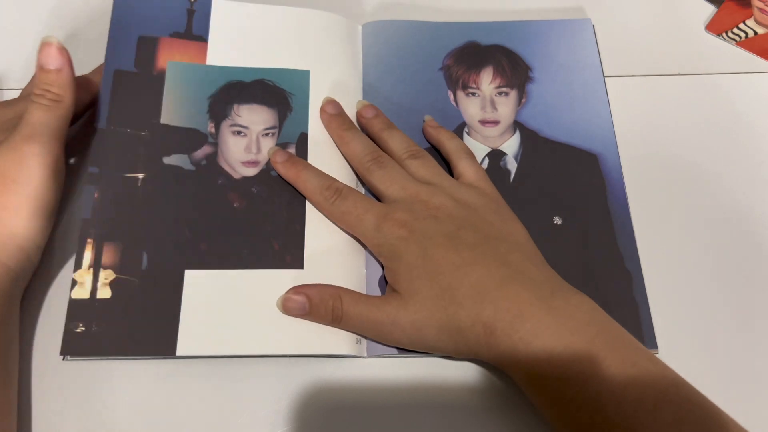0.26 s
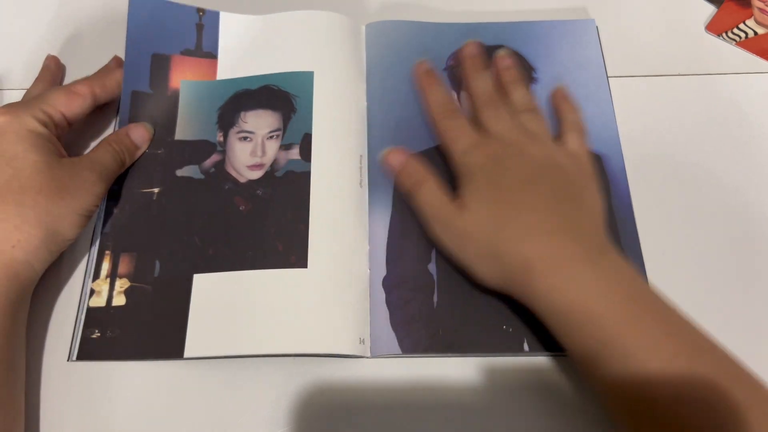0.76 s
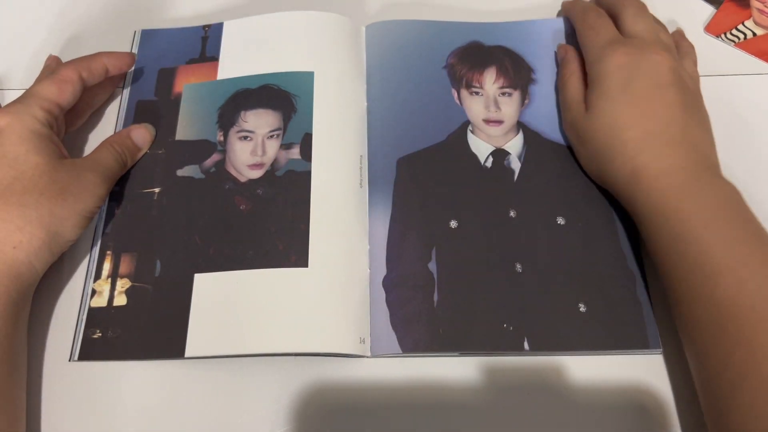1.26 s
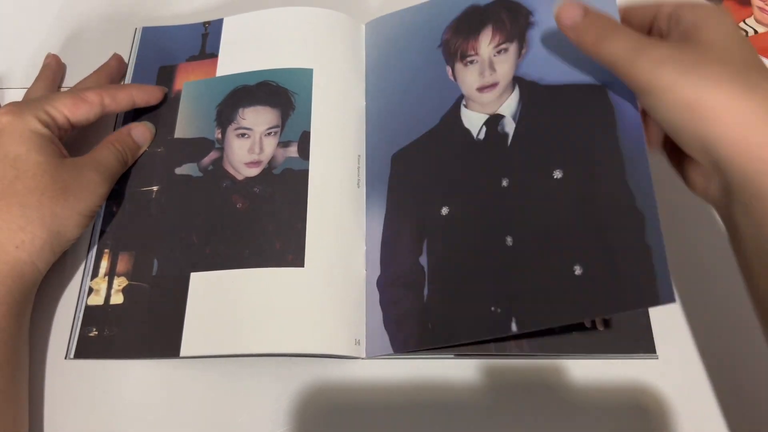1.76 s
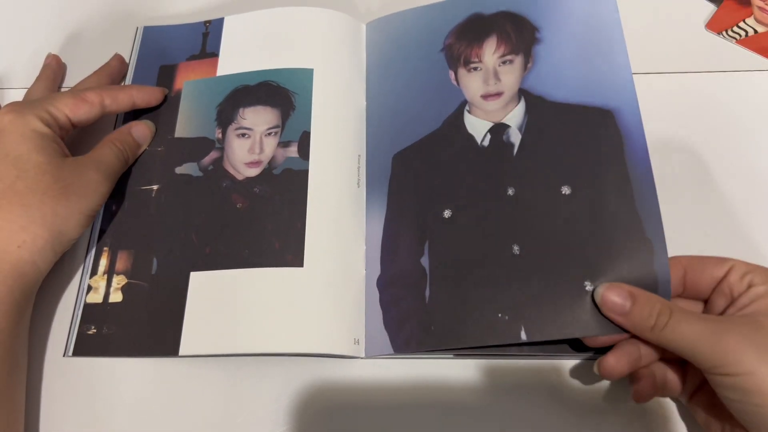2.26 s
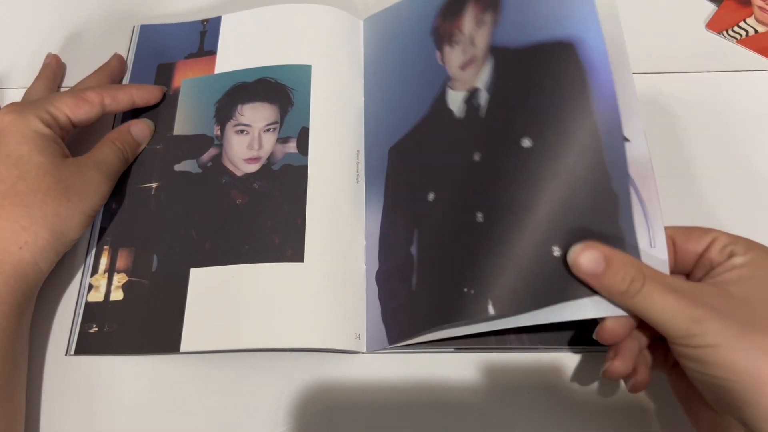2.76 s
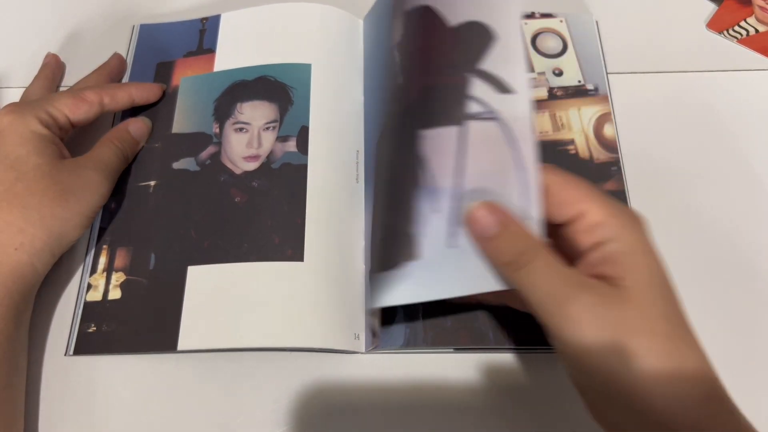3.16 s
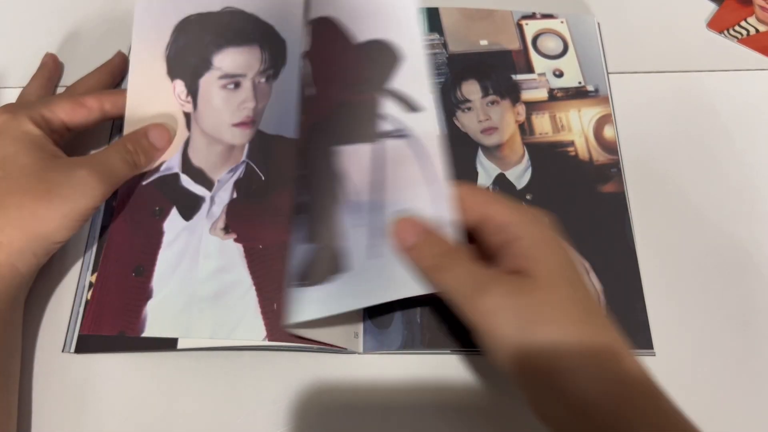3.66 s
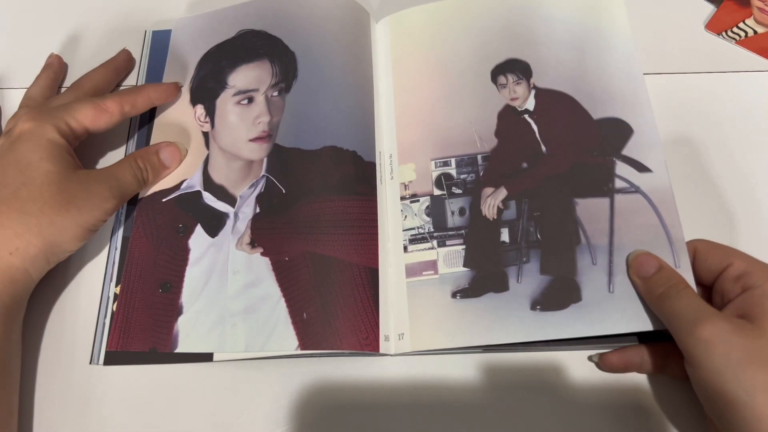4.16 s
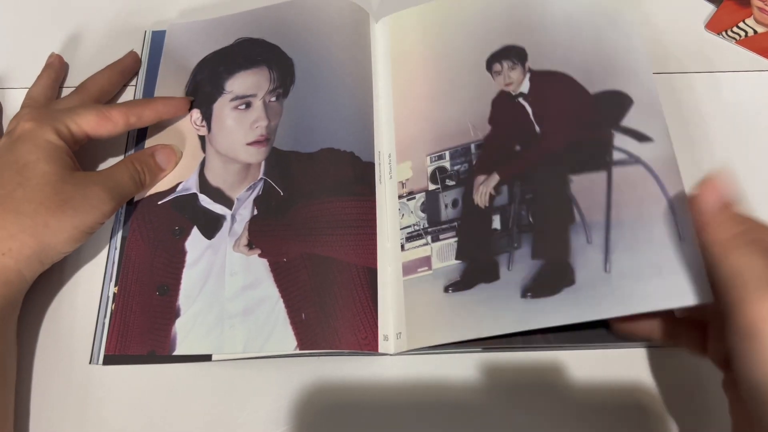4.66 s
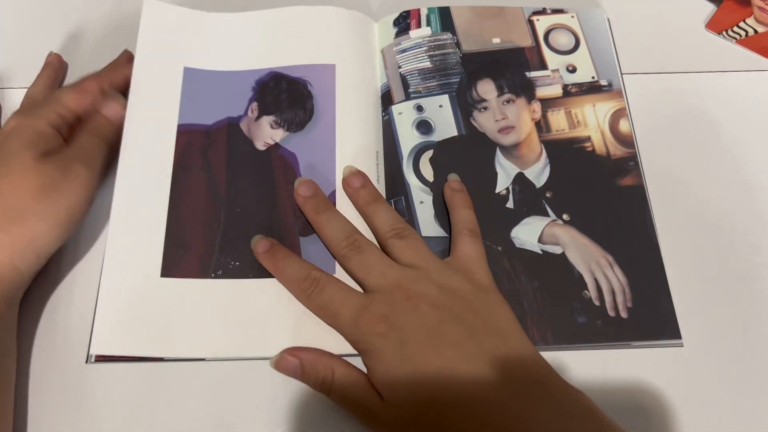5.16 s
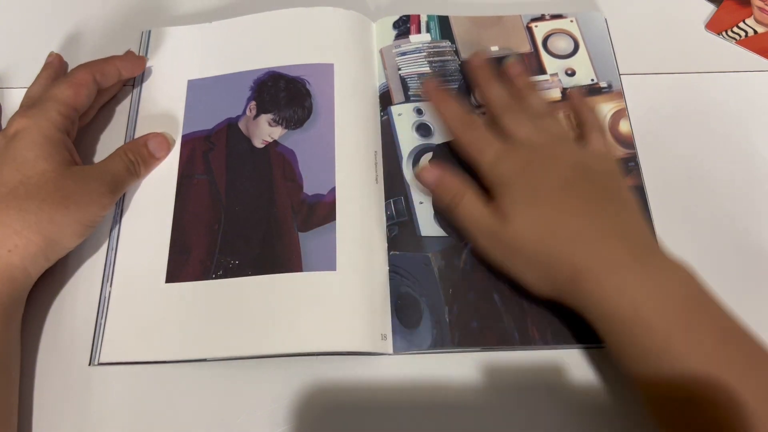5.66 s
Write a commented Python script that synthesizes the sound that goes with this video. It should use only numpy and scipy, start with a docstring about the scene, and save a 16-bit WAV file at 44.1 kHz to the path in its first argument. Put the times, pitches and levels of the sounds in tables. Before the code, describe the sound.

Close indoor sound of a glossy photo book handled on a table. A hand slides softly over a page, then fumbles at its edge with small creaks and taps. A singing scrape leads to bright snaps as pages turn, with more crackles and thuds. After a quieter hold, another page is flipped and smoothed with a fading hiss. Phone stereo pickup, faint room hiss.

```python
"""First a short rustle of paper that dies away into a faint narrow hiss and a low rumble: a quiet room.
Then hands smooth and turn the glossy pages of a book on a table, under a phone's two microphone ports.
Skin and sheets slide in dense random slips; bent sheets creak and snap through resonances of the paper;
a drag along a sheet edge sings with a sinking pitch. Fingers and pages thud on the table top, nails or
sheet corners tick, and the walls echo these short hits. The two ports hear it all with unlike phase."""
import sys
import numpy as np
from scipy import signal
from scipy.fft import rfft, irfft
from scipy.io import wavfile
from scipy.ndimage import uniform_filter1d

SR = 44100
rng = np.random.default_rng(int(sys.argv[2]) if len(sys.argv) > 2 else 0)


def unload_wav(signal):
    """Save mono or channel-first audio to the path in sys.argv[1] as 16-bit WAV at rate SR, clipped to [-1, 1]."""
    wavfile.write(
        sys.argv[1],
        SR,
        np.round(np.clip(np.atleast_2d(signal).T, -1, 1) * 32767).astype(np.int16),
    )


N = 261513
HZ = np.maximum(np.fft.rfftfreq(N, 1 / SR), 1)
T = np.arange(N) / SR


def undb(db):
    """Decibels to gain."""
    return 10 ** (np.asarray(db) / 20)


def unit(x):
    """Scale to rms 1."""
    return x / np.sqrt(np.mean(x ** 2))


def over_hz(table, column=1):
    """Read a table column along a log-frequency axis."""
    rows = np.array(table, float)
    return np.interp(np.log(HZ), np.log(rows[:, 0]), rows[:, column])


def colour(x, gain):
    """Filter by a gain per frequency."""
    return irfft(rfft(x) * gain, N)


def steep(x, hz, kind):
    """Steep high- or low-pass."""
    return signal.sosfilt(signal.butter(4, hz, kind, fs=SR, output="sos"), x)


def ring(x, hz, width_hz):
    """One resonance, gain 1 at the centre."""
    return signal.lfilter(*signal.iirpeak(hz, hz / width_hz, fs=SR), x)


def modes(x, table):
    """Resonances of a body, each a narrow ring followed by one three times as wide, summed."""
    return sum(undb(db) * ring(ring(x, hz, width), hz, 3 * width) for hz, width, db in table)


def fade(t, t60):
    """Exponential decay by 60 dB in t60 seconds, at least 10 ms."""
    return np.exp(-np.log(1000) * t / max(t60, .01))


def walk(rate):
    """Slow random wander of rms 1: levels held 1 / rate seconds, smoothed twice."""
    hold = int(SR / rate)
    steps = np.repeat(rng.standard_normal(N // hold + 1), hold)
    return unit(uniform_filter1d(uniform_filter1d(steps, hold), hold)[:N])


def slips(rate, spread_db, size=N):
    """Tiny slips of either sign at random moments, rate per second, a few much stronger than the rest."""
    happens, sign, strength = rng.random((size, 3)).T
    return (happens < rate / SR) * np.sign(sign - .5) * undb(-spread_db * np.log(1 - strength))


def add(out, s, x):
    """Mix x into out from time s."""
    i = int(s * SR)
    out[i:i + len(x)] += x[:N - i]


def together(a_db, b_db):
    """Two levels added as powers."""
    return 10 * np.log10(undb(a_db) ** 2 + undb(b_db) ** 2)


RAMP_DB = 20  # climbed in the attack, lost in the release; the same slopes run on outside


def gestures(table, column):
    """Level in dB of overlapping gestures, each an attack, a hold and a release; their powers add."""
    power = 1e-12
    for row in table:
        s, attack, hold, release = row[:4]
        rising = (s + attack - T) / attack
        falling = (T - s - attack - hold) / release
        slope = np.maximum(np.maximum(rising, falling), 0)
        power = power + undb(row[column] - RAMP_DB * slope) ** 2
    return 10 * np.log10(power)


ROOM_DB = -63.5  # rms level about which the room wanders
# Spectrum of the still room: (frequency [Hz], relative level [dB])
ROOM_SPECTRUM = [(18, -31), (35, 12), (70, -7), (130, -20), (300, -42), (450, -28), (620, -57),
                 (800, -25.5), (1000, -17.5), (1350, -22.5), (1560, -10), (1680, -7), (1830, -6),
                 (1980, -16), (2300, -18), (3000, -29), (3700, -26.5), (5000, -37), (9500, -41),
                 (16000, -26)]


def room():
    """A steady narrow hiss over low rumble: noise shaped by the spectrum of the room."""
    noise = unit(colour(rng.standard_normal(N), undb(over_hz(ROOM_SPECTRUM))))
    return noise * undb(ROOM_DB + 0.13 * walk(18))


ECHO_DB, ECHO_T60_S, ECHO_GAP_S = -11.5, 0.15, 0.004


def reflect(x, t60, after):
    """Dense random reflections that start after a gap and decay; the tail has unit energy."""
    t = np.arange(SR // 3) / SR
    tail = rng.standard_normal(len(t)) * fade(t, t60) * (t >= after)
    return signal.fftconvolve(x, tail / np.sqrt(np.sum(tail ** 2)))[:N]


# Resonances of the table top: (frequency [Hz], width of the narrow ring [Hz], level [dB])
TABLE_MODES = [(64.5, 16.8, 5.5), (95.2, 9.3, -0.5), (142, 27.6, -6.5), (186, 62, -16.5)]
# Resonances of loose pages: (frequency [Hz], width of the narrow ring [Hz], level [dB])
PAGE_MODES = [(197.7, 87, 9.5), (282, 174, -6), (470, 420, -3.5)]
FLAP_TOP_HZ = 544  # low-pass of the flapping pages


def hum(flap_db, press_db):
    """Loose pages flap dully; the table top hums under shifting pressure: slips ring the modes of each."""
    flap = unit(steep(modes(slips(600, 1.2), PAGE_MODES), FLAP_TOP_HZ, "low"))
    top = unit(modes(slips(900, 1.2), TABLE_MODES))
    return flap * undb(flap_db + 2.04 * walk(24.8)) + top * undb(press_db + 2.5 * walk(18))


THUD_T60_S, THUD_CYCLES = 0.13, 12.4  # ring time: a base [s] plus some cycles of the pitch
# Soft blows on the table: (time [s], peak level of the blow [dB], ring frequency [Hz],
# peak level of the loose pages relative to the blow [dB])
THUDS = [(0.222, -59.5, 310, 1), (0.238, -58, 233, -3), (0.369, -58, 167, -9), (0.385, -48.5, 107, -7.5),
         (0.526, -44.5, 196, -28), (0.538, -46, 95, -30), (0.691, -53, 71.6, -30), (0.846, -50.5, 235, -6),
         (0.861, -38, 123, -21), (0.878, -42, 94, -7), (1.5, -58, 99, 5.5), (1.768, -62, 188, 12),
         (1.831, -51, 190, -6), (1.854, -57.5, 91, -1), (1.901, -52, 189, -13), (1.922, -49, 179, -26),
         (2.133, -53.5, 69.4, 4.5), (2.263, -42.5, 75.4, -7), (2.368, -39.5, 86, -4.5),
         (2.408, -40, 68, -3), (2.463, -38, 78, -26), (2.698, -38, 93, -5.5), (2.891, -48, 140, 11.5),
         (2.924, -38.5, 170, 4), (3.072, -47, 208, 5), (3.192, -48, 168, -14), (3.292, -45.5, 95, -14),
         (3.482, -51, 104, 4), (3.622, -43.5, 230, 0), (3.739, -48, 183, 9), (3.845, -31, 72, -5),
         (3.911, -35.5, 172, -1.5), (4.206, -47, 100, 0.5), (4.253, -47, 76, -26), (4.335, -47, 213, -5),
         (4.351, -45.5, 82, -1.5), (4.578, -54.5, 252, -3), (4.669, -46.5, 110, 2), (4.813, -51, 262, -5),
         (4.823, -39.5, 208, -15), (4.837, -43, 202, -17), (5.068, -50.5, 194, 0), (5.089, -41, 116, -11),
         (5.18, -42.5, 100, -8), (5.343, -33.5, 112, -20.5), (5.37, -37.5, 83, -44.5),
         (5.552, -51, 77.5, -40), (5.588, -36.5, 80, -64), (5.771, -45, 114, -33)]


def thuds():
    """A soft push shorter than a cycle, with some jolts after it, rings book block, table top and pages."""
    out, t = np.zeros(N), np.arange(SR // 2) / SR
    for s, db, hz, pages_db in THUDS:
        t60 = THUD_T60_S + THUD_CYCLES / hz
        jolts = 0.4 * slips(90, 1.3, size=len(t)) * fade(t, t60)
        jolts[0] = 1  # the blow itself
        push = np.convolve(jolts, np.hanning(int(0.7 * SR / hz)))[:len(t)]
        book = ring(ring(push, hz, 7.7 / t60), hz, 11.0 * hz)
        blow = book + 0.26 * modes(push, TABLE_MODES)
        # the slips of the pages build up within milliseconds, then die sooner than the blow
        rattle = slips(600, 1.5, size=len(t)) * fade(t, 0.7 * t60) * t / (t + 0.003)
        pages = modes(0.53 * jolts + 0.5 * rattle, PAGE_MODES)
        thud = blow / abs(blow).max() + undb(pages_db) * pages / abs(pages).max()
        add(out, s, undb(db) * thud)
    return out


TICK_T60_S = 0.019
# Thin ticks of a nail or a sheet corner: (time [s], peak level [dB])
TICKS = [(0.0987, -40.5), (0.347, -50.5), (1.269, -65), (1.422, -46.5), (1.501, -34.5), (2.3436, -39.5),
         (2.367, -40), (2.4487, -51.5), (2.9, -27.5), (3.586, -38.5), (3.839, -28.5), (3.852, -28.5),
         (4.2075, -47), (4.663, -39.5), (4.838, -47.5), (5.143, -35), (5.335, -52.5)]


def ticks():
    """A hard small contact: one bright click with a whisper of noise after it, through a broad resonance."""
    out, t = np.zeros(N), np.arange(SR // 10) / SR
    for s, db in TICKS:
        burst = 0.8 * rng.standard_normal(len(t)) * fade(t, TICK_T60_S)
        burst[0] = 2.5  # the click
        tick = steep(ring(burst, 4000, 6800), 1430, "high")
        add(out, s, undb(db) * tick / abs(tick).max())
    return out


SURGE_DB = 2.1  # rms wander of each half octave
# Spectrum of skin sliding on the coating: (frequency [Hz], relative level [dB])
SKIN_SPECTRUM = [(600, -41), (950, -5), (2000, 0), (4200, -1.5), (6500, -1.5), (9000, 1.5), (12000, 0.5),
                 (16000, 4.5)]


def skin(db):
    """Finger ridges slip over the coating so densely that they hiss; each half octave surges on its own."""
    hiss = colour(slips(16000, 1.6), undb(over_hz(SKIN_SPECTRUM)))
    octaves = np.log2(HZ / 1000)
    grainy = np.zeros(N)
    for centre in np.arange(-1, 4.5, .5):
        band = colour(hiss, np.clip(1 - 2 * abs(octaves - centre), 0, 1))
        grainy += band * undb(SURGE_DB * walk(35))
    return unit(grainy) * undb(db + 2.5 + 0.23 * walk(30))


SHEET_LOW_HZ = 666  # high-pass of scraping, creaking and edge drags
SCRAPE_LOW_HZ, SCRAPE_TOP_HZ = 860, 4560
# Low resonances of a sheet: (frequency [Hz], width of the narrow ring [Hz], level [dB])
SHEET_MODES = [(777, 258, 6.5), (958, 140, 4.5), (1251, 380, 6), (1600, 150, -1)]


def sheet(scrape_db, flex_db):
    """Sheet on sheet scrapes in the upper middle; bending creaks ring the low sheet modes."""
    scrape = steep(ring(slips(7000, 1.33), 2490, 2600), SCRAPE_TOP_HZ, "low")
    scrape = unit(steep(steep(scrape, SCRAPE_LOW_HZ, "high"), SHEET_LOW_HZ, "high"))
    flex = unit(steep(modes(slips(2000, 1.9), SHEET_MODES), SHEET_LOW_HZ, "high"))
    patchy_db, creaky_db = 1.8 * walk(40), 1.7 * walk(45)
    return scrape * undb(scrape_db - 5.5 + patchy_db) + flex * undb(flex_db - 1.7 + creaky_db)


GAP_SHARPNESS, GAP_WOBBLE = 6, .035  # pitch over width; relative spread of pitch from grain to grain
OVERTONE, OVERTONE_DB, BROAD_DB = 1.42, -15, -11  # pitch ratio and level of a second, level of a broad ring
GRAIN, HOP = 1024, 256  # samples
# A finger drags along a sheet edge, one curve a drag:
# (time [s], resonance of the air gap [Hz], level before a 3 dB cut [dB])
EDGE_DRAGS = [
    [(0.365, 5900, -68), (0.385, 5770, -52.5), (0.42, 5350, -51), (0.45, 5500, -63)],
    [(2.085, 3300, -70), (2.1, 3300, -56), (2.115, 3300, -62)],
    [(2.14, 3400, -70), (2.155, 3240, -56), (2.19, 3160, -62), (2.225, 3100, -67)],
    [(2.25, 3300, -64), (2.26, 3300, -62), (2.283, 3200, -65), (2.3, 3200, -69)],
    [(2.58, 3600, -44.5), (2.602, 3480, -36.5), (2.625, 3300, -32), (2.64, 2970, -35), (2.665, 2620, -34.5),
     (2.71, 2340, -35.5), (2.735, 2130, -38.5), (2.78, 2100, -43), (2.83, 1980, -50), (2.87, 1900, -72)],
    [(3.01, 3300, -64), (3.045, 3400, -49), (3.1, 3380, -50), (3.125, 3200, -71)],
    [(5.07, 2550, -64), (5.088, 2550, -51), (5.108, 2450, -62), (5.13, 2400, -67)],
]


def drag():
    """Rough scraping coloured by the moving resonance of the air gap and its overtone, in overlapping grains."""
    out, window = np.zeros(N), np.hanning(GRAIN)
    for curve in EDGE_DRAGS:
        s, hz, db = np.transpose(curve)
        for t in np.arange(s[0], s[-1], HOP / SR):
            centre = np.interp(t, s, hz) * (1 + GAP_WOBBLE * rng.standard_normal())
            width = centre / GAP_SHARPNESS
            rough = slips(3500, 2.2, size=GRAIN)
            gap = unit(ring(rough, centre, width))
            broad = unit(ring(rough, centre, 1.1 * centre))
            overtone = unit(ring(rough, OVERTONE * centre, width))
            grain = unit(gap + undb(BROAD_DB) * broad + undb(OVERTONE_DB) * overtone)
            add(out, t - GRAIN // 2 / SR, window * grain * undb(np.interp(t, s, db) - 3))
    return steep(out, SHEET_LOW_HZ, "high") * undb(0.99 * walk(60))


CRACKLE_S, SNAP_T60_S = 0.014, 0.031  # steady crackle, then its decay, for a snap at 1 kHz
SHORTENING_POWER = 1.15  # higher snaps are shorter by this power of pitch
UPPER_TOP_HZ = 3400
# Buckles that pop through: (time [s], peak level of the body [dB], centre frequency [Hz],
# peak level of the upper ring relative to the body [dB])
SNAPS = [(0.166, -50.5, 1060, -18), (0.219, -52, 1010, -4), (0.347, -44, 1550, -18), (0.36, -48, 1010, -20),
         (0.515, -49.5, 1050, -16), (1.271, -52.5, 1510, -18.5), (1.421, -52, 1700, -9),
         (1.447, -53, 1610, 3), (1.462, -52, 1700, 3), (1.5, -42, 1560, -4), (1.772, -59, 686, -20),
         (1.793, -49, 1260, -4), (1.845, -48, 730, -25), (1.965, -49, 1510, -12), (2.1, -43, 1470, -9),
         (2.113, -47, 925, -23), (2.127, -48.5, 774, -33), (2.17, -47, 1300, 5), (2.186, -47, 1160, -8),
         (2.245, -46, 1350, -14), (2.257, -47, 1470, 1), (2.27, -40.5, 1390, -8), (2.283, -42.5, 1250, -10),
         (2.343, -45.5, 1390, 5.5), (2.368, -41.5, 950, -24), (2.522, -41, 1400, -24),
         (2.573, -42, 1600, 2), (2.597, -34, 1330, 0), (2.606, -38.5, 865, -1), (2.62, -38, 860, -10),
         (2.646, -35, 1280, -10), (2.687, -33.5, 1120, 11), (2.716, -37, 1400, -3),
         (2.727, -31.5, 1320, -5), (2.765, -42, 1200, -2), (2.848, -37, 880, -16), (2.891, -28, 1500, -8),
         (2.8925, -18, 2480, -19), (2.902, -21.5, 4080, -25), (2.906, -36, 850, -17),
         (2.911, -31, 1090, -17), (2.9245, -21.5, 1070, -22), (2.928, -22.5, 1220, -15),
         (2.932, -28, 1040, -24), (2.937, -32, 1200, -19), (2.944, -29.5, 744, -4), (2.947, -28, 1500, -17),
         (2.954, -32, 815, -18), (2.972, -42, 760, -25), (3.071, -25, 1410, -2.5), (3.14, -46.5, 1380, 6),
         (3.194, -36, 1260, 0.5), (3.196, -42.5, 710, -30), (3.197, -49.5, 390, -30),
         (3.291, -36, 1310, -6), (3.295, -38.5, 994, -6), (3.391, -47, 1100, 0), (3.401, -42, 930, -15),
         (3.487, -44, 1040, -22), (3.584, -40, 1740, -13), (3.59, -34.5, 1250, -7), (3.623, -18, 1660, 6),
         (3.6235, -21, 990, -30), (3.626, -22, 920, -38), (3.628, -27, 4300, -30),
         (3.629, -17.5, 2060, -0.5), (3.631, -25, 3070, -20), (3.723, -35.5, 1180, -6),
         (3.737, -28.5, 1140, -7), (3.844, -25.5, 775, -37), (3.849, -23.5, 960, -30),
         (3.853, -24.5, 1330, -2), (3.855, -30, 1620, 3), (3.868, -37, 890, -15), (3.913, -32.5, 1000, -12),
         (3.928, -31, 1150, -20), (4.21, -40, 1490, 1), (4.342, -49.5, 860, -15), (4.452, -49, 910, -9),
         (4.577, -56, 970, -12), (4.59, -44, 1400, -11), (4.669, -45, 684, -9), (4.695, -45.5, 890, -15),
         (4.81, -42, 1040, -25.5), (4.819, -40.5, 910, -28), (4.8245, -43, 1020, -40),
         (4.834, -40, 890, -31), (4.845, -41.5, 725, -34), (4.886, -50, 1920, -20), (4.924, -42, 4600, -30),
         (5.048, -46, 980, -16), (5.06, -33.5, 1130, -28), (5.068, -33.5, 1580, -31),
         (5.072, -37, 805, -22), (5.075, -28.5, 2400, -8), (5.142, -47, 1990, -18), (5.155, -40.5, 960, -5),
         (5.169, -47, 1400, -17), (5.174, -27.5, 1560, -6), (5.175, -28, 3430, -5),
         (5.178, -39.5, 850, -18), (5.186, -46, 1590, -15), (5.579, -46, 1226, -14)]


def snaps():
    """A buckle gives way with a sharp click, then a few more; all ring the sheet briefly."""
    out, t = np.zeros(N), np.arange(SR // 4) / SR
    for s, db, hz, upper_db in SNAPS:
        short = (1000 / hz) ** SHORTENING_POWER
        clicks = .36 * slips(450, 1.6, size=len(t)) + 0.07 * rng.standard_normal(len(t))
        clicks[0] = 3.6  # the first, sharp click
        clicks = clicks * fade(np.maximum(t - CRACKLE_S * short, 0), SNAP_T60_S * short)
        clicks = np.convolve(clicks, np.hanning(12))[:len(t)]  # a sheet gives way in a quarter millisecond
        body = ring(ring(ring(clicks, hz, 0.42 * hz), hz, 0.5 * hz), hz, 0.5 * hz)
        body = body + 0.29 * min(short, 1) * modes(clicks, SHEET_MODES)
        upper = steep(ring(ring(clicks, 2590, 1150), 2640, 1230), UPPER_TOP_HZ, "low")
        snap = body / abs(body).max() + undb(upper_db) * upper / abs(upper).max()
        add(out, s, undb(db) * snap)
    return out


FLAP_PER_PRESSURE_DB, HUM_PER_BEND_DB = -32, -9.5
# Fingers slide over a page: (start [s], attack [s], hold [s], release [s],
# skin level before trim [dB], sheet scraping level before trim [dB])
STROKES = [(0, 0.00058, .003, 0.15, -68, -58), (.11, 0.051, 0.024, 0.025, -63, -61),
           (.19, 0.023, 0.0077, 0.07, -67, -64), (.345, 0.038, 0.052, 0.16, -57, -56.5),
           (.42, 0.11, 0.12, 0.17, -52.5, -56.5), (.55, 0.14, 0.14, 0.34, -45, -51),
           (.95, 0.098, 0.061, 0.044, -64, -69), (1.15, 0.04, 0.35, 0.059, -99, -72),
           (1.38, 0.016, 0.069, 0.048, -64.5, -74), (1.45, 0.069, 0.0059, 0.17, -49.5, -53),
           (1.6, 0.0093, 0.13, 0.034, -62.5, -57.5), (1.785, 0.028, 0.076, 0.048, -57, -55.5),
           (1.87, 0.048, 0.034, 0.31, -56, -53.5), (2.04, 0.051, 0.02, 0.055, -54, -96),
           (2.14, 0.012, 0.039, 0.016, -57.5, -55), (2.19, 0.012, 0.019, 0.052, -66, -62),
           (2.25, 0.008, 0.015, 0.062, -54, -49), (2.33, 0.008, 0.044, .02, -56.5, -63),
           (2.38, 0.025, .005, 0.3, -72, -62), (2.53, 0.021, 0.045, .1, -52.5, -56),
           (2.6, 0.1, 0.1, 0.23, -43, -41.5), (2.86, 0.043, 0.002, 0.023, -42.5, -42),
           (2.93, 0.096, 0.035, 0.19, -48, -50.5), (3.12, 0.062, 0.0038, 0.16, -51.5, -46.5),
           (3.22, 0.074, 0.0081, 0.044, -53, -48), (3.34, 0.063, 0.0061, 0.07, -54.5, -47),
           (3.46, 0.021, 0.115, .02, -71, -59), (3.57, 0.015, 0.056, 0.27, -53, -45),
           (3.66, 0.13, 0.039, 0.067, -46, -49), (3.83, 0.018, 0.0019, 0.016, -66, -32),
           (3.86, 0.01, 0.079, 0.064, -54.5, -48.5), (4.203, 0.004, .003, 0.025, -73, -51),
           (4.21, .011, 0.023, 0.069, -76, -62), (4.32, 0.011, 0.033, 0.064, -76, -65.5),
           (4.36, 0.084, 0.0084, 0.12, -68.5, -57), (4.55, 0.032, 0.0041, 0.21, -52.5, -53.5),
           (4.83, 0.01, 0.02, .03, -79, -82), (4.83, 0.072, .005, 0.2, -52, -80),
           (4.99, .1, 0.01, 0.075, -47.5, -44), (5.13, 0.013, 0.028, 0.081, -57.5, -44),
           (5.33, 0.0027, 0.011, 0.028, -111, -72), (5.37, 0.069, 0.036, 0.94, -55, -54.5),
           (5.38, 0.18, 0.14, 0.44, -48, -77)]
# A sheet is bent or lifted: (start [s], attack [s], hold [s], release [s],
# flexing level before trim [dB], level of loose pages flapping [dB])
BENDS = [(0, 0.00059, .003, 0.075, -53, -52.5), (.04, 0.02, 0.023, 0.28, -67, -76),
         (.345, 0.023, 0.018, 0.017, -62, -58), (.48, 0.095, 0.35, 0.25, -66, -77),
         (.95, 0.087, 0.67, 0.13, -84, -74), (1.39, 0.069, 0.073, 0.069, -61, -63.5),
         (1.62, 0.072, 0.044, 0.055, -68.5, -77), (1.76, 0.051, 0.058, 0.045, -64, -66.5),
         (1.88, 0.029, 0.032, 0.12, -63.5, -72), (2.08, 0.02, 0.12, 0.082, -62, -72.5),
         (2.23, 0.036, 0.015, 0.03, -51.5, -63), (2.32, 0.017, 0.018, 0.031, -57, -62),
         (2.36, 0.026, 0.089, 0.038, -61.5, -58.5), (2.54, 0.067, 0.026, 0.043, -39.5, -51),
         (2.6, 0.069, 0.09, 0.3, -49.5, -51.5), (2.86, 0.067, 0.011, 0.033, -41, -63),
         (2.95, 0.038, 0.25, 0.21, -58, -63.5), (3.24, 0.039, 0.013, 0.035, -62, -80),
         (3.35, 0.041, 0.04, 0.055, -54, -59), (3.578, 0.0097, 0.07, 0.1, -46.5, -58),
         (3.69, 0.046, .005, 0.072, -48.5, -57.5), (3.832, 0.02, 0.0065, 0.022, -37.5, -69),
         (3.86, 0.025, 0.078, 0.053, -51, -53.5), (4.37, 0.053, 0.035, 0.13, -63, -76),
         (4.55, 0.044, 0.087, 0.061, -55, -60), (4.8, 0.047, 0.059, 0.051, -73, -54.5),
         (4.85, 0.061, 0.0085, 0.12, -57, -70), (5.02, 0.038, 0.019, 0.032, -51.5, -66),
         (5.13, 0.043, 0.017, 0.037, -53, -52.5), (5.6, 0.13, 0.15, 0.14, -71, -100)]
# Weight of the hands on book and table: (time [s], level of the table hum [dB])
PRESSURE = [(0.0, -66.5), (0.36, -66), (0.84, -63), (1.55, -68), (2.21, -63.5), (2.39, -48), (2.49, -59),
            (2.86, -56), (3.1, -78), (3.34, -56), (3.52, -56), (3.83, -59), (4.0, -61), (4.26, -81),
            (4.46, -59), (4.92, -61), (5.0, -62.5), (5.93, -63.5)]


def rustle():
    """All that lasts: rubbing, bending, table and room; bending and weight both stir pages and table."""
    bend_db = gestures(BENDS, column=4)
    weight_db = np.interp(T, *np.transpose(PRESSURE))
    flap_db = together(gestures(BENDS, column=5), weight_db + FLAP_PER_PRESSURE_DB)
    press_db = together(bend_db + HUM_PER_BEND_DB, weight_db)
    background = room() + hum(flap_db, press_db)
    rubbing = skin(gestures(STROKES, column=4))
    sheets = sheet(gestures(STROKES, column=5), bend_db)
    return background + rubbing + sheets + drag()


# The two microphone ports: (frequency [Hz], sum level [dB], difference level [dB],
# phase of the difference [rad], share of the difference tied to the sum [0-1])
PORTS = [(41.8, -14, -62, 1.9, 0.2), (89, -1, -11.5, 3.6, 0.63), (163, -6, -14, 1.5, 1),
         (276, -1, -8.5, 4.1, 0.46), (395, 3.5, 1.5, 4.5, 0.94), (688, -5.5, -2.5, 4.36, 1),
         (790, 1, 1, 3.8, 0.58), (960, 1, -1, 1.8, 0.6), (2000, -3, -21, 4.3, 0.35),
         (2320, -3, -6.5, 3.7, 0.15), (4830, -4, -6, 4.8, 0.5), (4850, -8.5, 0.5, 4.6, 0.2),
         (5850, 0.5, -13.5, 4.3, 0.2), (7360, 0, -37.5, 5.6, 0.8), (10200, -7.5, -12, 4.5, 0.7),
         (11250, -6.5, -2.5, 5, 0.4), (15300, -32, -7, 2, .6)]


def ports(direct, spread):
    """Sum and difference of two ports; sound spread over the pages adds an unrelated part to the difference."""
    tied = np.clip(over_hz(PORTS, column=4), 0, 1)
    gain = undb(over_hz(PORTS, column=2))
    turn = np.exp(1j * over_hz(PORTS, column=3))
    side = colour(direct, gain * tied * turn) + colour(spread, gain * np.sqrt(1 - tied ** 2))
    mid = colour(direct, undb(over_hz(PORTS, column=1)))
    return np.array([mid + side, mid - side])


def scene():
    """Hits with their echo from the walls, over the rustle; a second, independent rustle is the spread sound."""
    sharp, dull = snaps() + ticks(), thuds()
    echo = undb(ECHO_DB) * reflect(sharp + dull, ECHO_T60_S, ECHO_GAP_S)
    direct = rustle() + sharp + dull + echo
    spread = rustle() + reflect(sharp, 0.14, 0) + dull
    return ports(direct, spread)


SUM_TOP_HZ, TOP_HZ, BASS_HZ = 12000, 15850, 45


def record(dry):
    """The sum is low-passed, so the top range is heard only in the difference; bass rolls off; a steep cut ends it."""
    mid, side = (dry[0] + dry[1]) / 2, (dry[0] - dry[1]) / 2
    mid = signal.sosfiltfilt(signal.ellip(8, .1, 45, SUM_TOP_HZ, fs=SR, output="sos"), mid)
    bass_cut = signal.butter(2, BASS_HZ, "high", fs=SR, output="sos")
    both = signal.sosfilt(bass_cut, [mid + side, mid - side])
    return signal.sosfilt(signal.ellip(10, .2, 80, TOP_HZ, fs=SR, output="sos"), both)


dry = scene()
out = record(dry)
unload_wav(out)
```